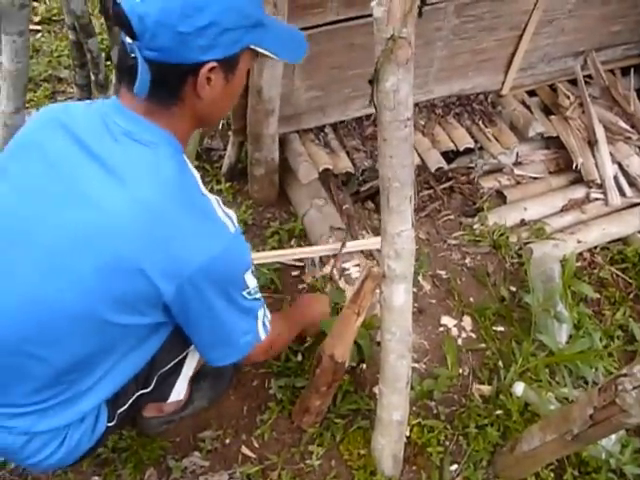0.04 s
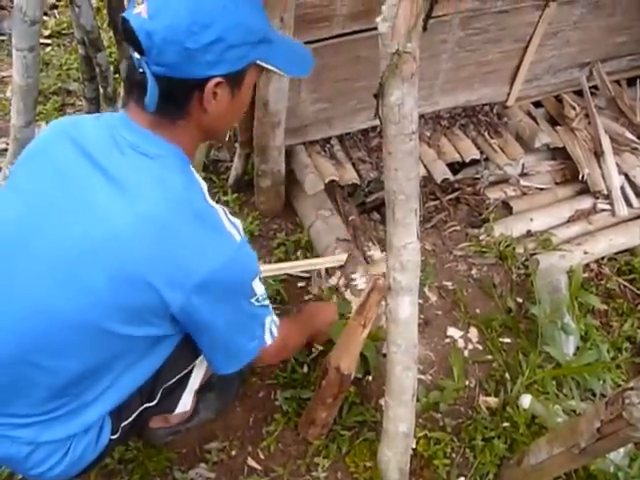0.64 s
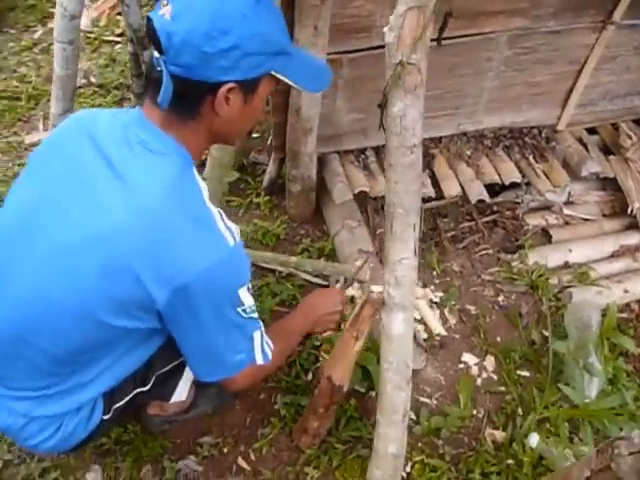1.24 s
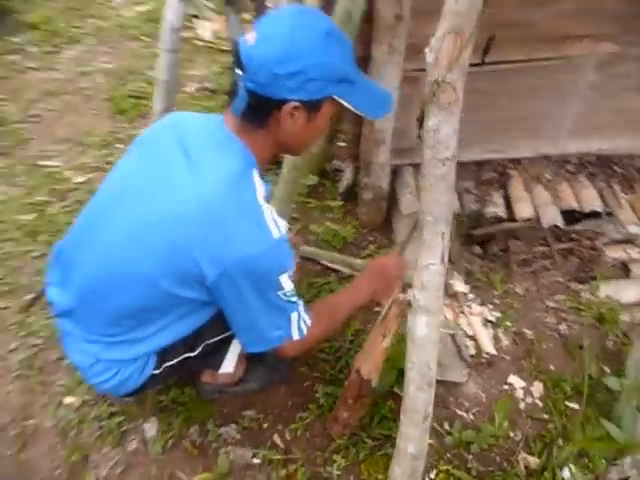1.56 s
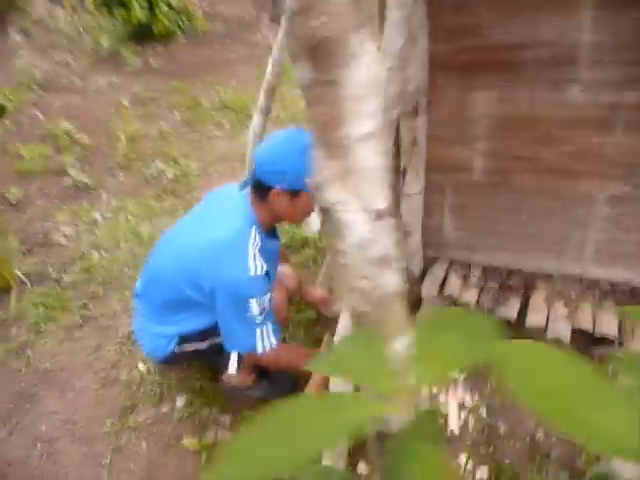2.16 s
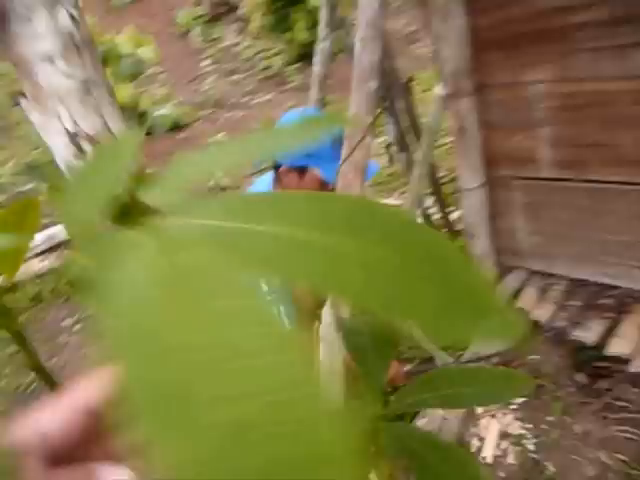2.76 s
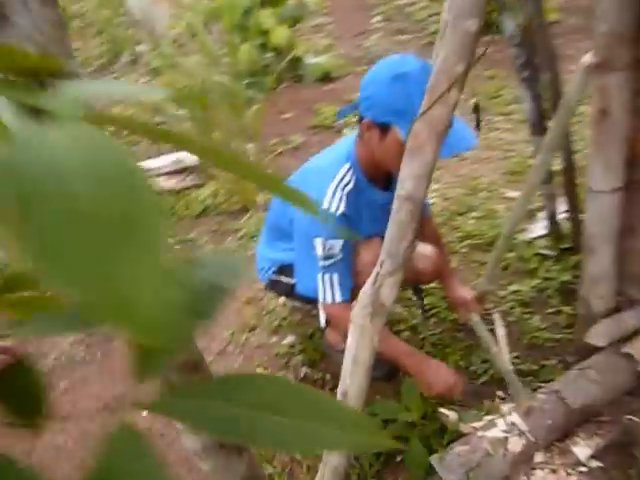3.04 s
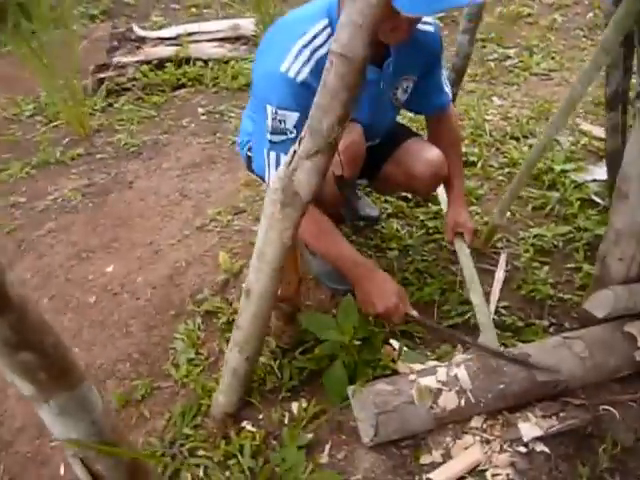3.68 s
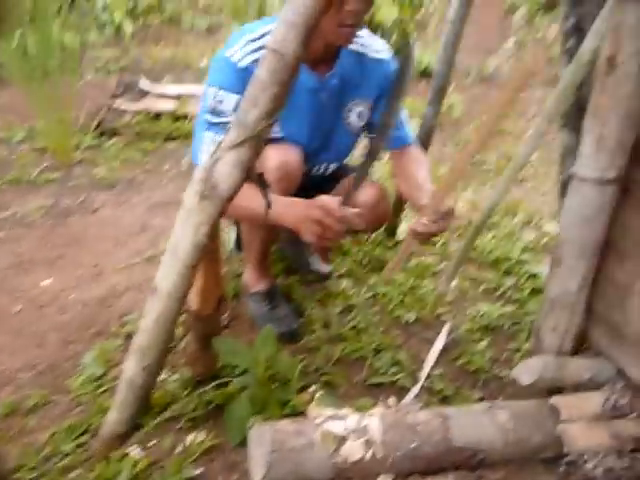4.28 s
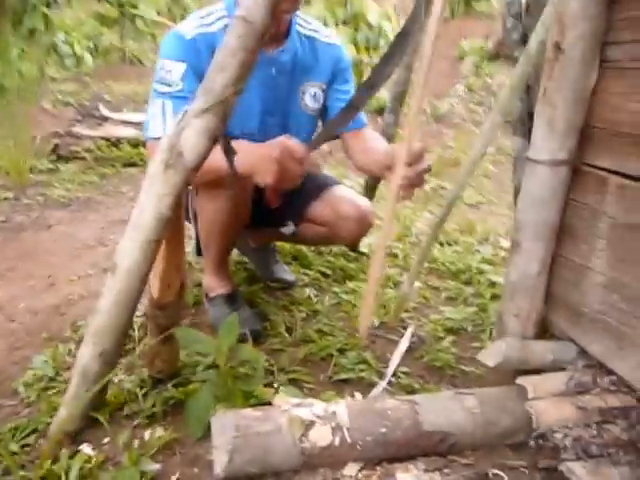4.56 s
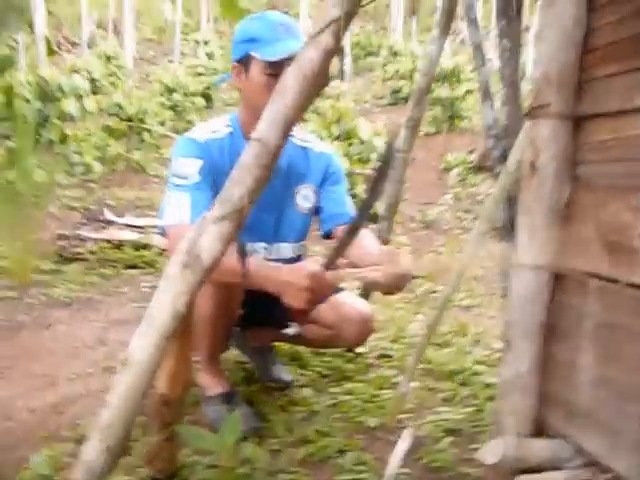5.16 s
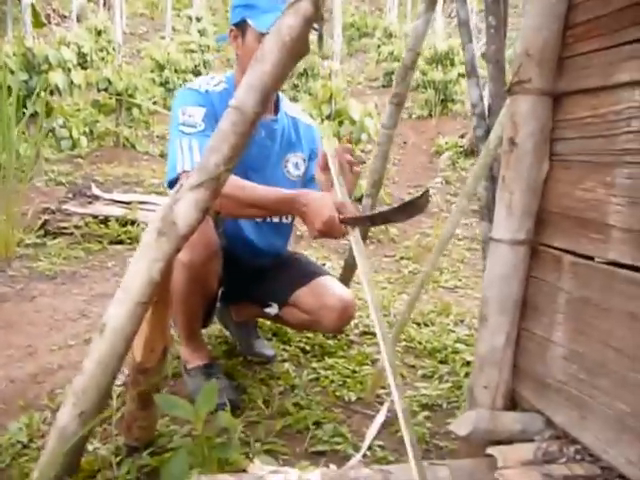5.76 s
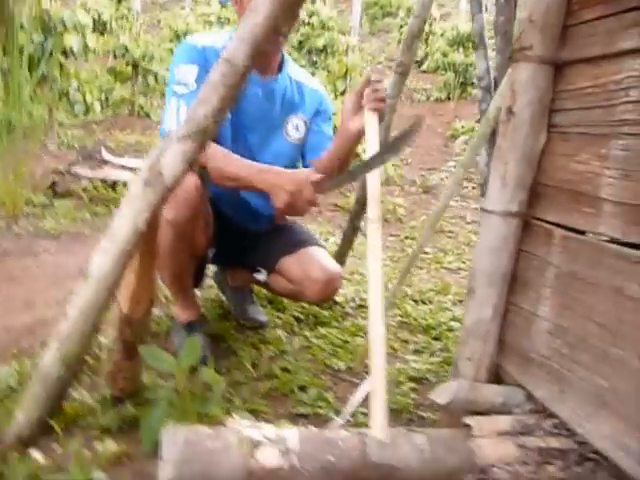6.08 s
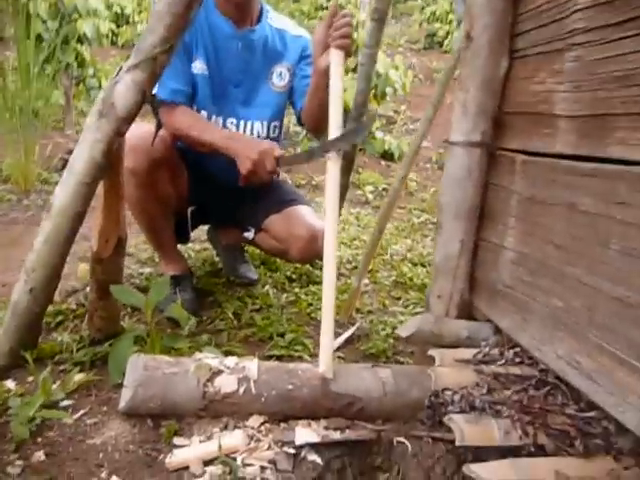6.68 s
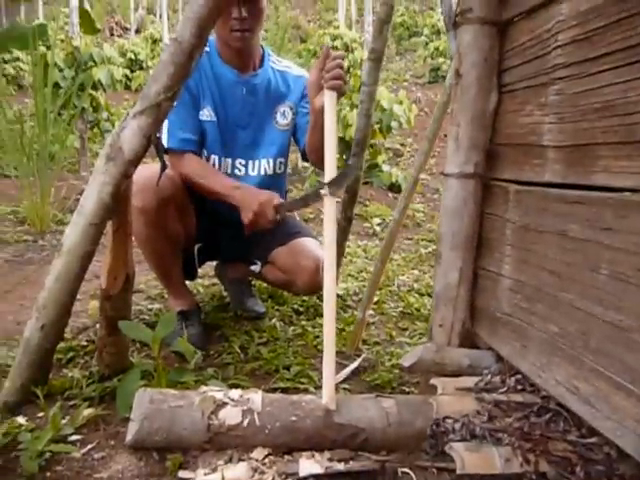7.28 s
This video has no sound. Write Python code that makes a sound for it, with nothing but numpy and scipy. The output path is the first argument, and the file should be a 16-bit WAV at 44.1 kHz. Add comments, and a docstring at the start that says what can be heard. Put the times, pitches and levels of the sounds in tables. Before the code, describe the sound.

A machete chops and shaves a bamboo strip with woody knocks outdoors, as leaves rustle, cicadas drone and a small bird twitters.

```python
"""A machete bites into a bamboo strip on a log: a woody knock, a low thud and a crack of tearing fibres.
More chops follow, a plank hut booming softly after each, then the strip is shaved and split upright.
The microphone is carried past leafy plants with rustle, swishes, snaps and soft bumps, and the camera's
lens motors whirr now and then. Behind it all cicadas drone in the open air, a small bird twitters,
another hoots, and a cricket takes up its beat past halfway."""
import sys
import numpy as np
from scipy import signal
from scipy.fft import rfft, irfft
from scipy.io import wavfile
from scipy.ndimage import uniform_filter1d

SR = 44100
rng = np.random.default_rng(int(sys.argv[2]) if len(sys.argv) > 2 else 0)


def store_wav(level_fs):
    """Save 16-bit WAV to argv[1]."""
    pcm = np.round(np.clip(np.atleast_2d(level_fs), -1, 1) * 32767)
    wavfile.write(sys.argv[1], SR, pcm.T.astype(np.int16))


N = 331632
T = np.arange(N) / SR
HIT = T[:4096]  # time axis of one short hit

# machete cuts: t/s, knock/dB, strip f/Hz, log thud/dB, shell clack/dB, fibre crack/dB, bite time/s,
# time to the blade's stop/s, echo send/dB, fibre pitch/ratio
CUTS = [(0.0624, -26, 473, -30.5, -22.5, -18.5, 0.0028, 0.0012, -10, 1.0),
        (0.7068, -12, 628, -27, -15, -22, 0.0014, 0.00093, -13, 1.0),
        (1.7877, -22.5, 884, -25.5, -23, -16.5, 0.0017, 0.0019, -9.5, 1.0),
        (2.2917, -20.5, 867, -29.5, -15.5, -13, 0.0017, 0.0013, -14, 1.02),
        (2.739, -20.5, 870, -32, -17.5, -20.5, 0.0017, 0.0023, -15.5, 1.0),
        (3.162, -16, 753, -20.5, -21.5, -21.5, 0.0021, 0.0011, -15.5, 1.02),
        (3.613, -13.5, 570, -19, -20, -43.5, 0.0021, 0.00059, -14.5, 1.0),
        (5.789, -45.5, 730, -32, -40.5, -46, 0.0028, 0.001, -12.5, .9),
        (6.6239, -35, 948, -32, -34, -22, 0.0034, 0.0061, -11.5, 1.07),
        (7.0075, -29.5, 845, -26.5, -32, -23.5, 0.0024, 0.0034, -16.5, 1.1),
        (7.3011, -42.5, 880, -30.5, -29.5, -23.5, 0.0036, 0.0054, -12, 1.07)]
# bending modes of the strip: pitch/ratio, gain/dB, t60/s
STRIP_MODES = [(1, 13, 0.026), (1.17, 3, 0.026)]
# modes of the bamboo's hard shell, the log and the splitting fibres: f/Hz, gain/dB, t60/s
SHELL_MODES = [(1376, -4.5, 0.0033), (1550, -2.5, 0.0061), (1780, -10, 0.009), (2497, 8.5, 0.0039)]
LOG_MODES = [(128, -0.5, 0.08), (181, 6.5, 0.069), (256, 11.5, 0.033), (274, -6.5, 0.1), (462, 2, 0.13)]
FIBRE_MODES = [(3400, -3.5, 0.0056), (3530, -2.5, 0.0075), (3850, -2.5, 0.0082), (5040, 1.5, 0.005),
               (5880, 5.5, 0.0058), (6280, 0, 0.013)]
# cuts that drive the foot of the upright strip into the log: t/s, level/dB, f/Hz
END_THUMPS = [(6.634, -33.5, 165), (7.015, -41, 194), (7.313, -32.5, 209)]
# how strongly the hut takes up the blows, fading as the microphone leaves its wall: t/s, gain/dB
HUT_FADE = [(0.7, 6.5), (3.2, -2.5), (5.8, -17)]
# the blade dragging along the strip: t/s, level/dB
SCRAPE_FADE = [(6.17, -66), (6.25, -44.5), (6.35, -36.5), (6.39, -39.5), (6.43, -30.5), (6.49, -44.5),
               (6.56, -56)]
# small bamboo chips landing after the cuts: t/s, level/dB
CHIP_TICKS = [(.827, -48), (.924, -56), (1.084, -55), (1.134, -51), (7.161, -50)]
# steps, twigs and small knocks: t/s, relative body level/dB, f/Hz, relative snap level/dB, rise/s
BUMP_HITS = [(1.523, -25.5, 483, -59, 0.0015), (1.537, -20.5, 1090, -46, .0018),
             (1.585, -24.5, 1250, -42, 0.00076), (1.694, -22, 222, -57, 0.002),
             (1.844, -18, 970, -31, .0008), (2.04, -21, 1380, -48, .0024), (2.094, -27.5, 1400, -42, .0022),
             (2.241, -23, 475, -47, 0.0029), (2.489, -28, 604, -48, 0.00047),
             (2.873, -14.5, 350, -40, 0.0013), (3.078, -14, 1260, -21.5, 0.0036),
             (3.599, -12.5, 463, -41, 0.0025), (4.004, -24, 650, -52, 0.0024),
             (4.275, -28.5, 320, -55, 0.0019), (4.387, -25, 840, -52, 0.0011),
             (4.428, -27, 820, -55, 0.0011), (4.483, -19, 640, -55, 0.0014), (4.543, -25, 420, -52, 0.0016),
             (4.556, -19.5, 576, -43, 0.00154), (4.582, -20.5, 445, -55, 0.0021),
             (4.719, -20, 446, -45, 0.0055), (4.788, -20, 533, -56, 0.0006), (4.934, -21, 383, -65, 0.0065),
             (5.068, -32, 696, -63, 0.0014), (6.2996, -21.5, 594, -44, 0.0013),
             (6.3596, -15, 1530, -40, 0.001), (6.406, -25, 1560, -39, .0015),
             (6.423, -21.5, 1045, -63, .005)]
# stems and dry leaves breaking underfoot: t/s, level/dB
STEM_SNAPS = [(2.384, -37), (2.412, -39), (2.490, -31), (3.849, -32), (3.8705, -35), (3.931, -36.5),
              (3.9542, -35.5), (3.983, -41), (4.245, -44)]
# steady rustle of moving through the plants: t/s, cloth level/dB, relative leaf level/dB
RUSTLE_FADE = [(1.4, -58.5, -69), (1.55, -55, -65), (1.71, -40, -61), (1.88, -50.5, -61.5),
               (2.11, -52, -64.5), (2.34, -55, -64), (2.47, -45.5, -51), (2.71, -44, -47.5),
               (3.01, -36, -40), (3.23, -43.5, -50.5), (3.59, -49.5, -52), (3.76, -41.5, -43.5),
               (3.85, -45.5, -49.5), (3.93, -44.5, -52.5), (4.27, -43, -53), (4.56, -43.5, -53.5),
               (4.77, -55, -65), (5.12, -48.5, -64.5), (5.5, -68, -81)]
# swishes of a foot, sleeve or branch: middle t/s, length/s, cloth level/dB, relative leaf level/dB
SWISH_CUES = [(1.557, 0.069, -39, -77), (2.055, 0.056, -34.5, -53), (2.434, 0.16, -42.5, -53),
              (3.99, 0.2, -43.5, -46.5), (4.405, 0.1, -42.5, -65), (4.535, 0.094, -45, -53.5),
              (4.671, 0.1, -42.5, -48.5)]
# runs of the focus motor: start t/s, end t/s, level/dB
FOCUS_RUNS = [(4.658, 4.703, -40), (5.116, 5.186, -51), (5.275, 5.362, -44)]
# runs of the zoom motor: start t/s, end t/s
ZOOM_RUNS = [(5.925, 6.48), (7.38, 7.55)]
# twittered notes: middle t/s, length/s, top f/Hz, relative level/dB, place of the top (-1 start, 1 end)
BIRD_NOTES = [(0.037, 0.057, 4200, -54, 0.014), (4.11, 0.027, 3950, -45.5, 0.32),
              (4.158, 0.024, 3330, -48, -0.38), (4.226, 0.014, 3600, -47, 0.83),
              (4.248, 0.018, 3560, -46, -0.77), (5.827, 0.026, 4090, -55.5, 0.054),
              (5.885, 0.03, 5240, -54, 0), (6.014, 0.022, 4250, -51.5, 0.24),
              (6.036, 0.019, 3950, -50.5, -0.54), (6.064, 0.016, 4170, -52, 0.1),
              (6.128, 0.059, 4230, -53.5, -0.37), (6.183, 0.048, 4010, -48, -0.1),
              (6.225, .025, 3490, -45.5, -0.45), (6.302, 0.04, 3540, -47.5, -0.29)]
# soft hoots of a far bird: middle t/s, level/dB
FAR_HOOTS = [(.948, -61), (1.387, -64)]
# the cricket's tempo from its first chirp on: t/s, rate/Hz
CRICKET_TEMPO = [(4.436, 7.9), (5.3, 7.8), (5.8, 7.2), (6.85, 7.3), (7.2, 7.8)]
# slow swell of the hillside: t/s, air level/dB, cicada level/dB
HILLSIDE_FADE = [(0, -59.5, -48), (1.2, -56.5, -48.5), (2.3, -59, -48.5), (3.5, -52, -48),
                 (4.6, -60, -48.5), (5.6, -55.5, -48.5), (6.6, -50.5, -48), (7.56, -60.5, -50)]
# tone colours of the noise layers: f/Hz, relative level/dB
SCRAPE_EQ = [(100, -4), (300, 0.5), (600, 2.5), (820, 2.5), (1400, 10), (2000, -15), (3200, -8),
             (8000, -42.5)]
CLOTH_EQ = [(30, -13.5), (90, -1.5), (200, 2.5), (400, 6), (800, 3.5), (1400, -0.5), (2200, -30.5),
            (4000, -16), (8000, -55)]
LEAF_EQ = [(500, -28.5), (1500, 11), (3000, 8.5), (4300, 7.5), (6300, 5), (7300, 4.5), (8000, -22)]
PATTER_EQ = [(80, -27.5), (300, 7.5), (550, -8), (1300, -8), (2500, -45.5)]
FOCUS_EQ = [(150, -17), (400, -1.5), (800, -2.5), (1300, 5), (1900, -7.5), (2300, -15), (3100, -1.5),
            (3800, -17.5), (8000, -33)]
ZOOM_EQ = [(150, -7), (500, -2), (710, 7), (850, -10), (1200, 4), (1480, 8.5), (1750, -13), (2200, -11),
           (3200, -13), (8000, -30)]
CICADA_EQ = [(3800, -41.5), (4600, -29), (5100, -11.5), (5600, -10.5), (6150, -1.5), (6550, -9.5),
             (7100, -18), (7600, -36), (8200, -63.5)]
AIR_EQ = [(25, -8.5), (60, -2.5), (130, 3.5), (300, 6.5), (600, -0.5), (1100, -1), (2000, -11),
          (3000, -11.5), (4400, -12), (8000, -41)]
# narrow dips in the microphone's response: f/Hz, width of one notch stage/Hz
MIC_NOTCHES = [(2600, 321), (4610, 260), (5400, 138)]


def machete():
    """The lead layer: every cut with its echo, the hut's boom and the thumps of the upright strip."""
    direct, send = np.zeros((2, 2, N))
    for s, knock_db, hz, thud_db, clack_db, crack_db, bite_s, stop_s, echo_db, fibre_pitch in CUTS:
        cut = chop(knock_db, hz, thud_db, clack_db, crack_db, bite_s, stop_s, fibre_pitch)
        add(direct, s, cut)
        add(send, s, cut * undb(echo_db))
        hut_db = np.interp(s, *np.transpose(HUT_FADE))
        add(direct, s, hut_boom(thud_db + hut_db))
    for s, db, hz in END_THUMPS:
        add(direct, s, log_thump(db, hz))
    return direct + yard_echo(send)


def chop(knock_db, hz, thud_db, clack_db, crack_db, bite_s, stop_s, fibre_pitch, width=.55):
    """The edge tears through fibres while it sinks in; its stop knocks the strip against the log."""
    tear, tear_mid, tear_side = (unit(grains(len(HIT), 1) * swell(bite_s, sharp)) / np.sqrt(len(HIT))
                                 for sharp in (.98, .85, .85))
    push = swell(.00015, 8.7)
    blow = np.roll(push / push.sum(), int(stop_s * SR))
    split = np.roll(tear, int(stop_s * SR / 2))
    # the thin strip radiates little bass; a lower knock is a softer contact with less top end
    contact_hz = [.51 * hz, min(2.89 * hz, 4000)]
    # every cut meets the bamboo at a slightly different place
    shell_pitch = 1 + .033 * rng.uniform(-1, 1)
    strip = ring(blow + .37 * split, STRIP_MODES, hz)
    knock = burst(filtered(strip, 4, contact_hz, "band"), knock_db)
    # a quick bite clacks cleanly, a long one splinters
    shell = ring(blow + 680 * bite_s * split, SHELL_MODES, shell_pitch)
    clack = burst(filtered(shell, 4, contact_hz, "band"), clack_db)
    # the heavy log takes the load slowly and a little later
    load = np.roll(swell(.00065, 3.1), int(1.2 * stop_s * SR))
    thud = burst(ring(load, LOG_MODES), thud_db)
    crack = burst(ring(tear_mid, FIBRE_MODES, fibre_pitch), crack_db)
    # the short waves reach left and right unalike
    side_crack = burst(ring(tear_side, FIBRE_MODES, fibre_pitch), crack_db)
    side_shell = ring(tear_side, SHELL_MODES, shell_pitch)
    side_clack = burst(filtered(side_shell, 4, contact_hz, "band"), clack_db)
    side = width * (side_crack + .5 * side_clack)
    return knock + clack + thud + crack + np.array([side, -side])


def log_thump(db, hz, rise_s=.0032, t60_s=.076):
    """The log takes the strip end-on and answers with one hollow note."""
    envelope = (1 - np.exp(-HIT / rise_s)) * undb(-60 * HIT / t60_s)
    return burst(np.sin(2 * np.pi * hz * HIT) * envelope, db)


def hut_boom(drive_db, trim_db=-12.5, t60_s=.91, band_hz=(97, 193)):
    """The hut's loose planks hum on after a blow, low and soft."""
    planks = filtered(rng.standard_normal(SR), 2, band_hz, "band")
    return burst(planks * undb(-60 * T[:SR] / t60_s), drive_db + trim_db)


def blade_scrape():
    """The blade drags along the bamboo in rough catches."""
    drag, = curves(SCRAPE_FADE)
    return drag * friction(SCRAPE_EQ, wide_hz=3300, scatter_db=5.6, catch_per_s=200, catch_db=5.5)


def chip_ticks(hz=800, rise_s=.002):
    """The bamboo chips land softly: their body and shell ring lightly."""
    out = np.zeros((2, N))
    for s, db in CHIP_TICKS:
        touch = filtered(grains(len(HIT), 2) * swell(rise_s, .89), 4, 2 * hz)
        body = unit(ring(touch, [(hz, 0, .008)]))
        shell = unit(ring(touch, SHELL_MODES))
        add(out, s, burst(body + shell, db))
    return out + .5 * yard_echo(out)


def bumps(body_trim_db=-11, snap_trim_db=-4, echo_db=-14, firm_s=.0011, ring_cycles=8.5):
    """Steps and twigs crunch, each with a damped body and a small snap; low ones are soft and dull."""
    out = np.zeros((2, N))
    for s, body_db, hz, snap_db, rise_s in BUMP_HITS:
        crunch = grains(len(HIT), 2.6) * swell(rise_s, .6)
        # the quicker the contact, the more of it is one firm tap
        crunch[int(rise_s * SR)] += np.linalg.norm(crunch) * firm_s / rise_s
        body = ring(crunch, [(hz, 0, ring_cycles / hz)])
        body += .19 * ring(crunch, [(420, .0041, .012), (1200, .0043, .0035)])
        body = filtered(body, 3, min(1.95 * hz, 2000))
        add(out, s, burst(body, body_db + body_trim_db))
        for channel in out:
            snap = ring(grains(len(HIT), 2) * swell(rise_s, .18), FIBRE_MODES)
            add(channel, s, burst(snap, snap_db + snap_trim_db))
    return out + undb(echo_db) * yard_echo(out)


def stem_snaps(echo_db=-13, rise_s=.0023, band_hz=(1500, 6500)):
    """Each stem breaks in a quick cluster of bright clicks."""
    out = np.zeros((2, N))
    for s, db in STEM_SNAPS:
        clicks = stereo(grains((2, len(HIT)), 3.1) * swell(rise_s, .45), wide_hz=4600)
        add(out, s, burst(filtered(clicks, 1, band_hz, "band"), db) * np.sqrt(2))
    return out + undb(echo_db) * yard_echo(out)


def rustle(patter_db=-7, hiss_db=3, crackle_db=-1.5):
    """Cloth and leaves brush by the microphone while stems bump and crackle."""
    cloth_gain, leaf_gain = curves(RUSTLE_FADE)
    taps = undb(patter_db) * cloth_gain * stem_patter()
    for middle, length, cloth_db, leaf_db in SWISH_CUES:
        swish = np.cos(np.pi * np.clip((T - middle) / length, -.5, .5))
        cloth_gain += undb(cloth_db) * swish
        leaf_gain += undb(leaf_db) * swish
    cloth = friction(CLOTH_EQ, wide_hz=5000, scatter_db=6.7, catch_per_s=110, catch_db=2.04)
    crackle = undb(crackle_db) * leaf_crackle()
    hiss = undb(hiss_db) * friction(LEAF_EQ, wide_hz=3500, scatter_db=4.7, catch_per_s=160, catch_db=2.4)
    return cloth_gain * cloth + taps + leaf_gain * (hiss + crackle)


def stem_patter():
    """Stems bump softly at random moments."""
    taps = sprinkle(per_s=14, scatter_db=2, shape=swell(.002, 1))
    return colour(taps * rng.standard_normal(N), PATTER_EQ)


def leaf_crackle():
    """Tiny bright snaps scattered through the leaves."""
    snaps = sprinkle(per_s=45, scatter_db=6, shape=swell(.00091, .87))
    return colour(snaps * stereo_noise(wide_hz=3500), LEAF_EQ)


def focus_motor(step_hz=312, hum_db=-11):
    """The focus motor starts and stops abruptly: a stepping hum under gear rasp."""
    running = sum(undb(db) * (T > start) * (T < end) for start, end, db in FOCUS_RUNS)
    steps = np.sin(2 * np.pi * step_hz * T)
    rasp = colour(stereo_noise(wide_hz=4900) * (1 + .5 * steps), FOCUS_EQ)
    return uniform_filter1d(running, size=200) * (rasp + undb(hum_db) * unit(steps))


def zoom_motor(step_hz=312, whirr_db=-50.5, hum_db=-54):
    """The zoom motor holds one stepping tone under the whirr of its gears."""
    running = sum(1. * (T > start) * (T < end) for start, end in ZOOM_RUNS)
    whirr = colour(stereo_noise(wide_hz=4000), ZOOM_EQ)
    hum = unit(np.sin(2 * np.pi * step_hz * T) * undb(2 * wander(20)))
    return uniform_filter1d(running, size=800) * (undb(whirr_db) * whirr + undb(hum_db) * hum)


def birds(twitter_trim_db=-1, droop_per_s=4.1, hoot_hz=1125, hoot_s=.07):
    """One bird twitters in runs of hooked notes, the longer ones arching further; another hoots softly."""
    out = np.zeros(N)
    for s, length, hz, db, top_at in BIRD_NOTES:
        note = whistle(length, hz, droop=droop_per_s * length, waver=.017, top_at=top_at)
        add(out, s - length / 2, undb(db + twitter_trim_db) * note)
    for s, db in FAR_HOOTS:
        hoot = whistle(hoot_s, hoot_hz, droop=.019, waver=.023, top_at=1)
        add(out, s - hoot_s / 2, undb(db) * hoot)
    return out


def whistle(length, top_hz, droop, waver, top_at):
    """One bird note, loudest in its middle; the pitch curves down on either side of its top."""
    u = np.linspace(-1, 1, int(length * SR))
    wobble = tremble(80)[:len(u)]
    hz = top_hz * (1 - droop * np.abs(u - top_at) ** 1.7 + waver * wobble)
    return unit(np.sin(2 * np.pi * np.cumsum(hz) / SR) * (1 - u ** 2))


def cricket(pitch_hz=7300, sag_hz_per_s=16, scoop_hz=150, settle_s=.005, waver_hz=25, db=-49.5):
    """Each chirp scoops up to its pitch, trembles and dies away; the pitch sags slowly over the song."""
    s, rate = np.transpose(CRICKET_TEMPO)
    beats = np.cumsum(np.interp(T, s, rate, left=0)) / SR
    scoop = scoop_hz * np.exp(-HIT / settle_s)
    out = np.zeros(N)
    for start in T[1:][np.diff(np.ceil(beats)) > 0]:
        wobble = tremble(120)
        hz = pitch_hz - sag_hz_per_s * (start - s[0]) - scoop + waver_hz * wobble
        tone = np.sqrt(2) * np.sin(2 * np.pi * np.cumsum(hz) / SR)
        chirp = tone * swell(.01, .67) * undb(.37 * wobble)
        add(out, start, undb(db + .5 * rng.standard_normal()) * chirp)
    return out


def hillside(flutter_db=1.6):
    """The bed: soft open air and a chorus of far cicadas whose buzz shimmers."""
    air_gain, cicada_gain = curves(HILLSIDE_FADE)
    air = colour(stereo_noise(wide_hz=1200), AIR_EQ) * undb(flutter_db * wander(16))
    buzz = colour(stereo_noise(wide_hz=5000), CICADA_EQ)
    shimmer = undb(1.1 * wander(230) + .5 * wander(4.3))
    return air_gain * air + cicada_gain * buzz * shimmer


def yard_echo(x, near_t60_s=.15, far_t60_s=.36, far_db=-6.5, far_hz=1200, predelay_s=.0047):
    """Quick scatter from the hut wall and ground, and a longer dull tail from the trees."""
    t = T[:SR // 2]
    near, far = (stereo_noise(wide_hz=3000, count=len(t)) for _ in range(2))
    scatter = near * undb(-60 * t / near_t60_s)
    tail = filtered(far, 4, far_hz) * undb(far_db - 60 * t / far_t60_s)
    response = (scatter + tail) * np.clip(t / predelay_s - 1, 0, 1)
    response /= np.sqrt(np.sum(response ** 2) / 2)
    return signal.fftconvolve(x, response, axes=1)[:, :N]


def friction(eq, wide_hz, scatter_db, catch_per_s, catch_db):
    """Many tiny slips that come in uneven catches."""
    slips = stereo(grains((2, N), scatter_db), wide_hz)
    return colour(slips * undb(catch_db * wander(catch_per_s)), eq)


def ring(force, modes, pitch=1):
    """Damped modes driven by a force, their frequencies multiplied by pitch."""
    response = sum(undb(db - 60 * HIT / t60) * np.cos(2 * np.pi * hz * pitch * HIT)
                   for hz, db, t60 in modes)
    return signal.fftconvolve(force, response)[:len(HIT)]


def swell(rise_s, sharp):
    """A push that peaks after the rise time and dies away."""
    u = HIT / max(rise_s, 1e-4)
    return (u * np.exp(1 - u)) ** sharp


def grains(shape, scatter_db):
    """Dense clicks of unequal size."""
    return unit(rng.standard_normal(shape) * undb(scatter_db * rng.standard_normal(shape)))


def sprinkle(per_s, scatter_db, shape):
    """One short envelope triggered at random moments and levels."""
    triggers = (rng.random(N) < per_s / SR) * undb(scatter_db * rng.standard_normal(N))
    return signal.fftconvolve(triggers, shape)[:N]


def wander(per_s):
    """Smooth random drift over the whole scene, at rms 1."""
    k = max(int(SR / per_s), 1)
    steps = np.repeat(rng.standard_normal(N // k + 1), k)
    return unit(uniform_filter1d(steps, k)[:N])


def tremble(samples):
    """Quick wobble for one note: noise smoothed over this many samples, at rms 1."""
    return unit(uniform_filter1d(rng.standard_normal(len(HIT)), samples))


def stereo(pair, wide_hz):
    """Two unrelated sounds as mid and side: narrow in the bass, fully wide from wide_hz up."""
    count = pair.shape[-1]
    f = np.fft.rfftfreq(count, 1 / SR)
    side = irfft(rfft(pair[1]) * np.clip(f / wide_hz, .08, 1), count)
    return np.array([pair[0] + side, pair[0] - side])


def stereo_noise(wide_hz, count=N):
    """Hiss that widens towards the treble."""
    return stereo(rng.standard_normal((2, count)), wide_hz)


def colour(x, eq):
    """Shape a sound by an EQ curve, to rms 1."""
    hz, db = np.transpose(eq)
    f = np.maximum(np.fft.rfftfreq(N, 1 / SR), 1)
    gain = undb(np.interp(np.log(f), np.log(hz), db))
    return unit(irfft(rfft(x) * gain, N))


def filtered(x, order, hz, kind="low"):
    """A smooth low-, high- or band-pass."""
    return signal.sosfilt(signal.butter(order, hz, kind, fs=SR, output="sos"), x)


def curves(table):
    """Fader moves from rows of t/s and levels/dB, silent outside them."""
    s, *columns = np.transpose(table)
    return [undb(np.interp(T, s, db)) * (T >= s[0]) * (T <= s[-1]) for db in columns]


def burst(x, db):
    """Scale a short sound so that its energy equals 10 ms at this level."""
    return x * undb(db) * np.sqrt(.01 * SR / (np.sum(x ** 2) + 1e-20))


def add(out, s, x):
    """Mix a short sound in at time s."""
    i = max(int(s * SR), 0)
    out[..., i:i + x.shape[-1]] += x[..., :max(N - i, 0)]


def undb(db):
    """Decibels to gain."""
    return 10 ** (np.asarray(db) / 20)


def unit(x):
    """Scale to rms 1."""
    return x / np.sqrt(np.mean(x ** 2) + 1e-20)


def scene(call_echo_db=-5):
    """The mix: blade work and movement in front, lens motors close by, hillside and calls behind."""
    front = machete() + chip_ticks() + bumps() + stem_snaps() + rustle() + blade_scrape()
    motors = focus_motor() + zoom_motor()
    bed = hillside()
    calls = np.tile(birds() + cricket(), (2, 1))
    return front + motors + bed + calls + undb(call_echo_db) * yard_echo(calls)


def record(dry, low_cut_hz=85, top_hz=7850):
    """The camera thins the bass, rounds off the hardest blows, notches three bands and cuts the top."""
    x = filtered(dry, 1, low_cut_hz, "high")
    x = x / (1 + x ** 6) ** (1 / 6)  # soft clip
    for hz, width in MIC_NOTCHES:
        notch = signal.iirnotch(hz, hz / width, fs=SR)
        x = signal.lfilter(*notch, signal.lfilter(*notch, x))
    return signal.sosfilt(signal.ellip(7, .2, 44, top_hz, fs=SR, output="sos"), x)


dry = scene()
out = record(dry)
store_wav(out)
```